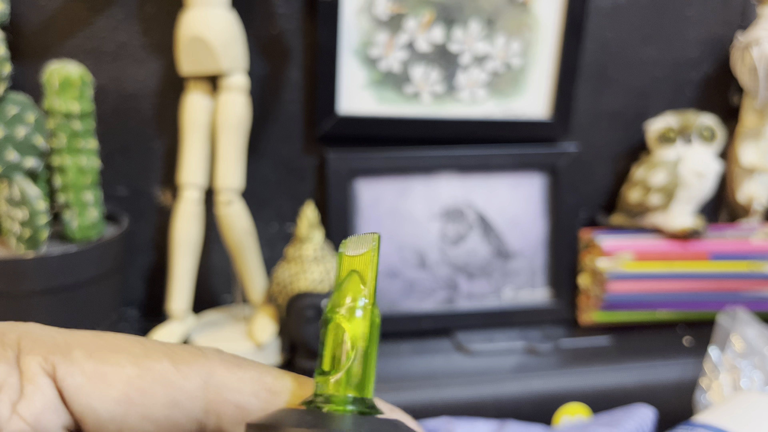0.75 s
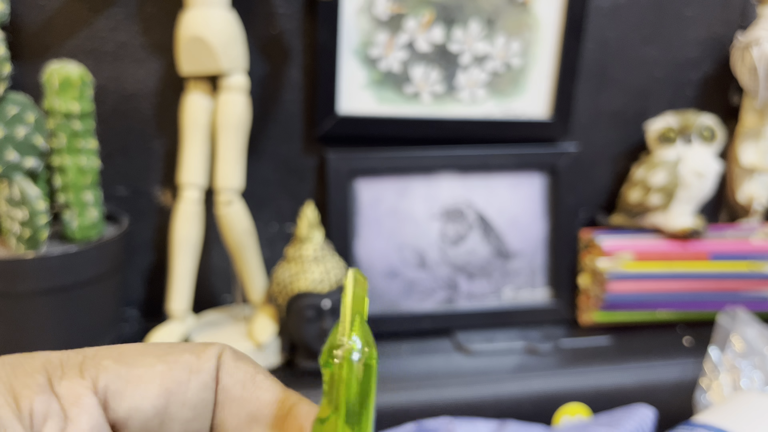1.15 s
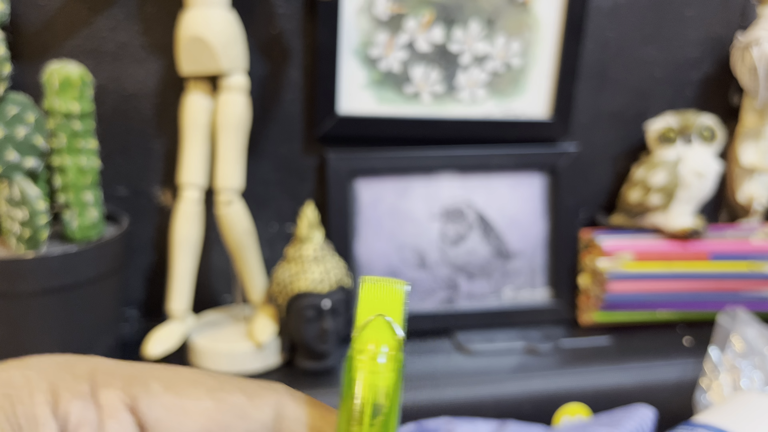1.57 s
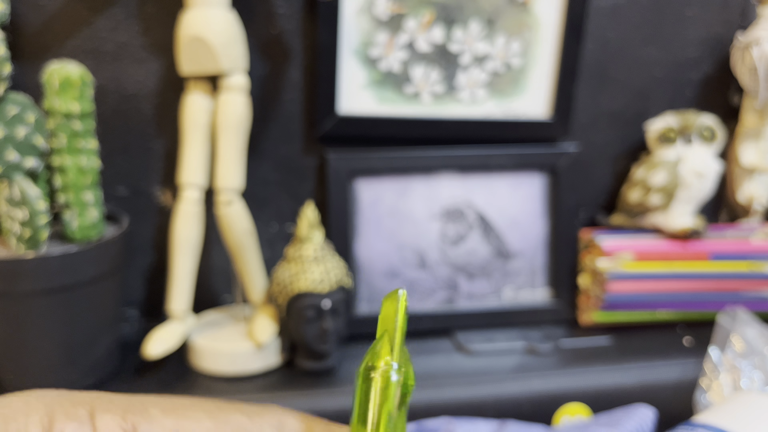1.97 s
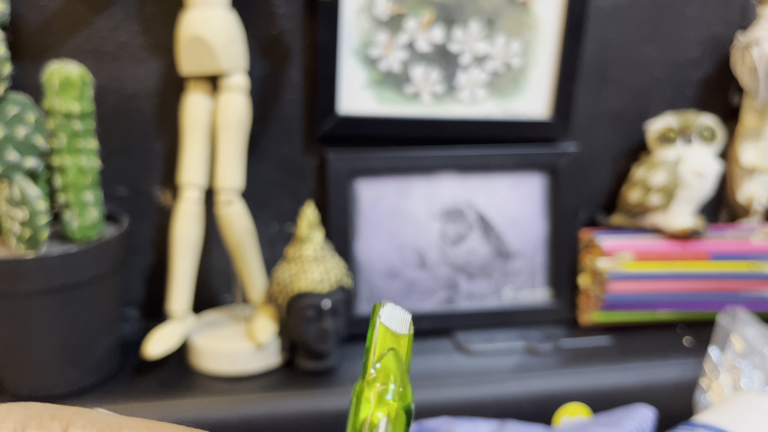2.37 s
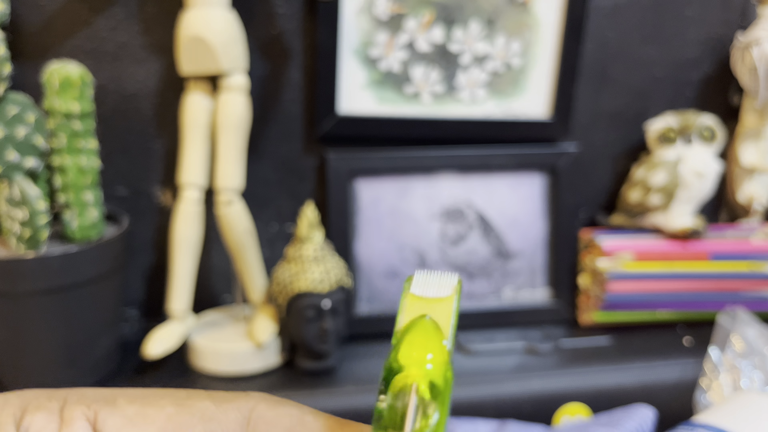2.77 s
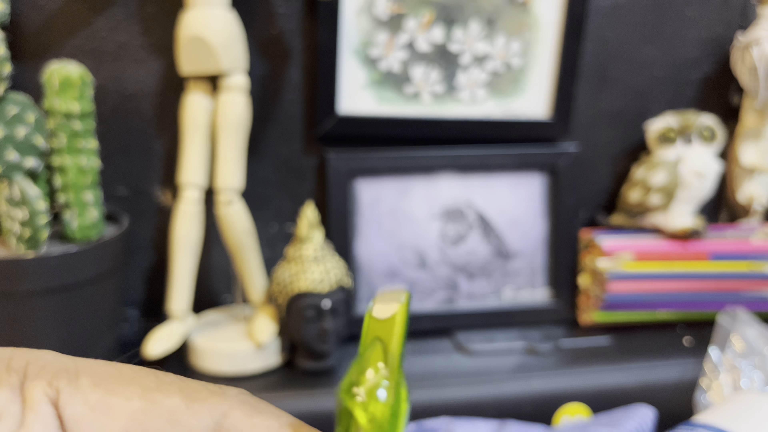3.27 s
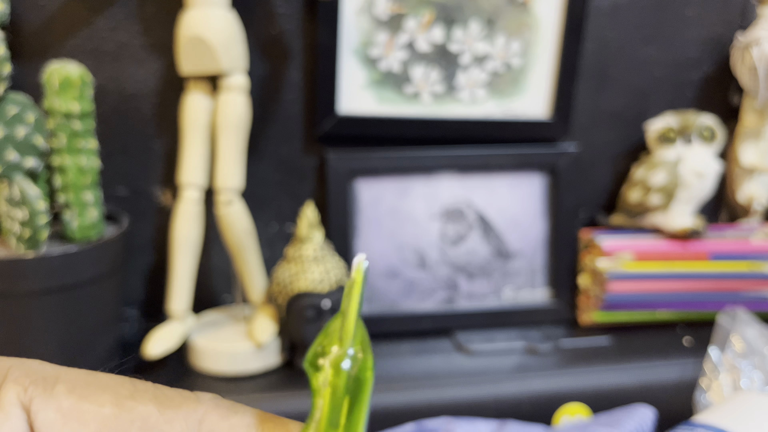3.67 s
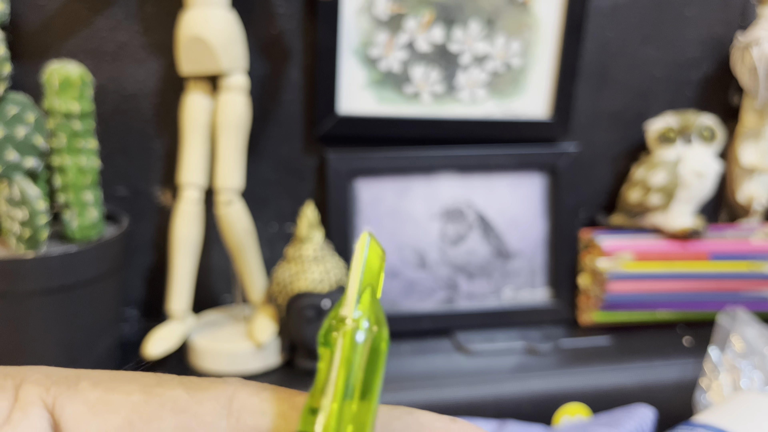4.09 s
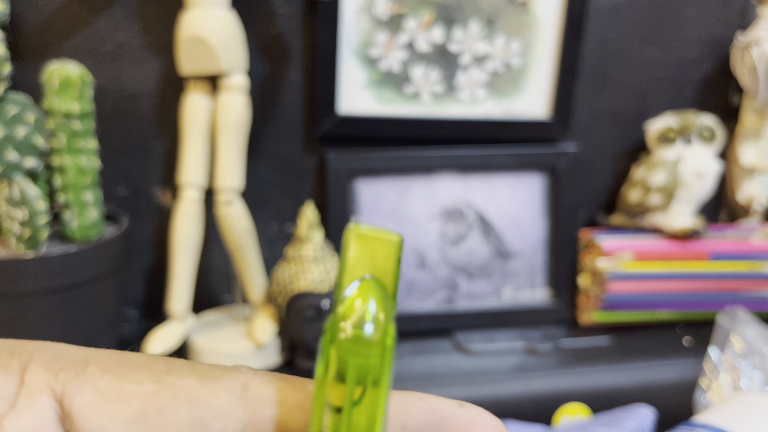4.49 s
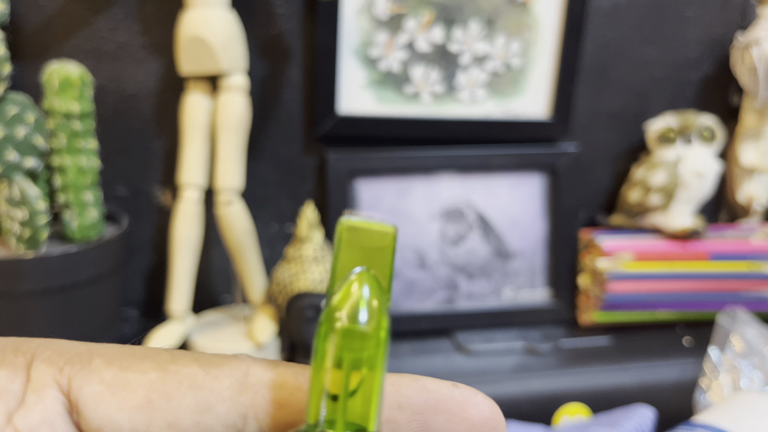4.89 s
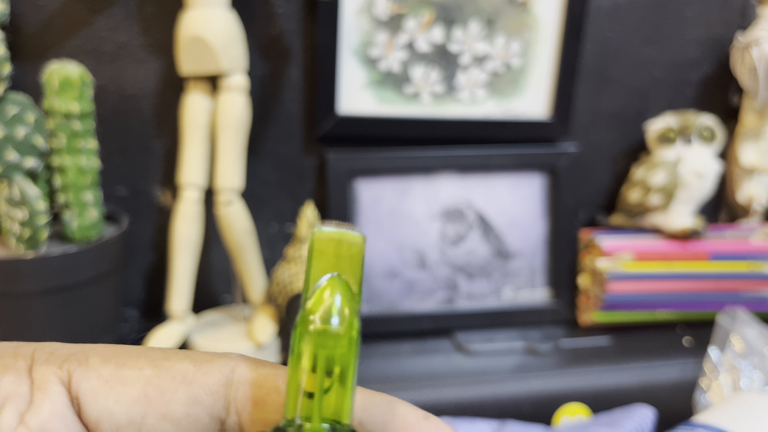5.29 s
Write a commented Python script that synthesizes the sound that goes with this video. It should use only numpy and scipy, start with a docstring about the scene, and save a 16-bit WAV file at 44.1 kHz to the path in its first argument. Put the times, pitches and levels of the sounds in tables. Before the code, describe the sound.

A small electric tattoo pen buzzes close by, softening as its adjustment ring is twisted through clusters of sharp clicks.

```python
"""A quiet room, a hand-held battery tattoo pen running close to a pair of microphone ports.
It starts loud and briefly sings, its cam knocking the needle bar twice a turn while loose parts rattle.
Over the first three seconds each twist of the depth ring clicks over a few notches, and the knock eases.
Then the clicks thin out, two faint hollow taps sound, and a whine stands out for a second before the
last two clicks. The pen turns in the hand as it runs; the room rumbles low beneath."""
import sys
import numpy as np
from scipy import signal
from scipy.fft import rfft, irfft
from scipy.io import wavfile
from scipy.ndimage import uniform_filter1d

SR = 44100
rng = np.random.default_rng(int(sys.argv[2]) if len(sys.argv) > 2 else 0)


def waveform_to_disk(signal):
    """Save audio, clipped to [-1, 1], as 16-bit WAV at the path in sys.argv[1]."""
    frames = np.transpose(np.atleast_2d(signal))
    scaled = np.clip(frames, -1, 1) * 32767
    samples = np.round(scaled).astype(np.int16)
    wavfile.write(sys.argv[1], SR, samples)


N = 244314
T = np.arange(N) / SR
BAND_LIMIT_HZ = 15800

# The motor shaft. Each row: time in seconds, speed in Hz.
SHAFT_SPEED = [(0, 120.8), (.2, 120.5), (.3, 121.0), (1.24, 120.8), (1.38, 119.85), (2.1, 120.05),
               (2.3, 120.7), (3.55, 120.7), (3.67, 120.3), (4.4, 119.97), (5.0, 119.83), (5.54, 119.7)]
# Twists of the depth ring. Each row: start and length in seconds, rebound lag in ms at grip and tube,
# the same at the tip, pitch ratios of grip, tube and tip, their three knock levels in relative dB.
TWISTS = [(0, 0, 2.4, 2.24, 1.09, 1.13, 1.016, -30, -37, -32),
          (0.216, 0.077, 1.92, 1.76, 1.125, 1.02, 0.96, -31, -40, -29.5),
          (0.387, 0.088, 1.8, 1.333, 1.064, 1.0, 1, -33, -56, -35.5),
          (0.774, 0.11, 1.425, 0.47, 0.93, 0.98, 0.96, -38, -35.5, -36),
          (1.245, 0.11, 1.12, 0.62, 1.12, 1.01, 1.075, -43.5, -49.5, -44.5),
          (1.678, 0.11, 0.96, .93, 0.93, 0.9, 1.08, -56, -69, -47),
          (2.116, 0.1, 1.1, .95, 1.13, 1.2, 1.15, -56, -55, -54.5),
          (2.625, 0.13, 0.73, 0.75, 0.9, 1.004, 1.02, -57, -50.5, -54.5),
          (3.543, 0.19, 0.78, .93, 0.84, 1.4, 1.08, -54.5, -57, -47),
          (4.005, 1, 0.83, .96, 1.46, 1.12, 1.19, -53, -52, -51),
          (5.38, 0, 1.03, .95, 0.98, 1.24, 0.95, -53.5, -49, -41.5)]
# The parts the knock rings. Each row: pitch in Hz, nominal width in Hz, relative level in dB.
GRIP_MODES = [(583, 150, -39), (907, 392, 23.5), (1315, 200, 1), (1440, 130, -1)]
TUBE_MODES = [(1778, 52, 10), (1920, 22, 8), (2160, 40, -3.5), (2900, 230, -22)]
TIP_MODES = [(3200, 1510, -3.5), (3740, 290, 13.5), (4317, 81, 7), (5193, 286, 3), (5430, 420, -6.5)]
# The buzz's tone colour. Each row: frequency in Hz near a harmonic of the knock, gain in dB.
KNOCK_COLOUR = [(240, 15), (363, 7), (484, 3.5), (604, 2.5), (725, 3), (846, -1), (1100, -4), (1210, 0),
                (1330, -6.5), (1450, -2), (1570, 0), (1700, 4.5), (1810, 2), (2000, 0.5), (2300, 5.5),
                (2700, 2.5), (3250, -9), (3385, 3.5), (3450, -17), (3630, 1.5), (3870, 2.5), (4150, -2),
                (4450, 4.5), (4750, 4.5), (5100, -5.5), (5500, 8)]
# The bearing's tone colour. Each row: frequency in Hz, gain in dB.
BEARING_COLOUR = [(600, -14), (1250, -5), (1600, 1), (2200, 1), (2550, -1), (3000, -16), (4200, -6),
                  (5000, -9), (6000, -30)]
# Bearing, whine and singing cartridge. Each row: time in seconds, level in dB.
BEARING_LEVEL = [(0, -48), (1.3, -52), (1.9, -47), (2.9, -50), (3.7, -48), (4.4, -47), (5.54, -48)]
WHINE_LEVEL = [(0, -68), (4.28, -62), (4.4, -45), (5.0, -46), (5.37, -44), (5.42, -64)]
SING_LEVEL = [(0, -34), (.08, -31), (.2, -35), (.29, -60), (5.54, -71)]
# Their tones as multiples of the shaft speed, and the gain of each whine tone in dB.
SING_ORDERS = [21, 22]
WHINE_ORDERS = [7, 13, 15, 17, 18, 19, 21, 33, 36]
WHINE_TONES_DB = [-14, -11, -8, 1, -6, -2, -11, -13, -18]

# Loose parts. Each row: time in seconds, then rattle, cartridge ring and hiss in relative dB.
LOOSE_LEVELS = [(0, -30.5, -28, -34.5), (.1, -29, -19.5, -31), (.21, -28.5, -30, -33),
                (.28, -38, -36, -46.5), (.7, -38.5, -43, -44.5), (1.15, -41, -38, -47),
                (1.55, -40, -45, -50.5), (2.05, -40.5, -42, -43.5), (2.45, -43, -42.5, -48),
                (3.0, -42, -46, -43.5), (3.6, -43, -45, -43.5), (4.15, -41, -75, -42.5),
                (4.5, -42.5, -52, -46.5), (5.3, -44, -47.5, -48), (5.54, -38, -39, -43)]
# The rattle, early and late, and the hiss. Each row: frequency in Hz, gain in dB.
RATTLE_EARLY = [(300, -17.5), (550, -12.5), (850, -3.5), (1300, -14.5), (2000, 4.5), (3000, 2.5), (4000, 3),
                (4600, 2), (5400, -1.5), (6500, -5.5), (8000, -14), (9500, -53)]
RATTLE_LATE = [(300, -26), (550, -14), (850, -4.5), (1050, -27), (1400, -9.5), (2000, -4), (2550, -1),
               (3050, -10), (3500, -2), (4300, 1.5), (5400, -2.5), (6500, -8), (8000, -10.5), (9500, -69)]
HISS_COLOUR = [(6000, -44), (7500, -6), (8900, -11.5), (9800, -3.5), (11000, 1.5), (12250, -7),
               (12650, -39), (13000, -15), (13500, -16), (14000, -8), (14800, 2), (15800, -6)]
# A broad ring of the rattle. Each row: time in seconds, level in dB, centre in Hz.
RASP = [(0, -57, 2250), (.3, -53, 2360), (1.7, -54.5, 2200), (2.2, -47.5, 2310), (2.8, -47, 2260),
        (3.3, -56, 2150), (3.9, -67, 2270), (4.15, -51, 2140), (4.4, -53, 1840), (5.54, -59, 2040)]
# The hiss peak shifts as the pen turns. Each row: time in seconds, centre in Hz, dB over the hiss.
SIZZLE = [(0.0, 10000, -8), (0.09, 9900, -9.5), (1.68, 9650, 1), (1.88, 9880, -6.5), (4.32, 9850, -3.5),
          (4.68, 9650, -2), (5.54, 9700, -2)]
# A narrow band of hiss comes and goes. Each row: time in seconds, dB over the hiss.
SHEEN = [(0, -25), (2.6, -16), (2.9, -12.5), (4.1, -19), (4.3, -22)]

# Notches of the depth ring. Each row: time in seconds, clatter in dB, snap lag in ms, then snap, tick
# and low clack in dB, lift of the upper modes in dB. The levels are relative.
NOTCHES = [(0.2644, -17, 2.1, -25, -21, -31, 3), (0.323, -26, 3.2, -10, -24, -37, -1),
           (0.44, -18, 0.34, -24, -23, -45, -4), (0.782, -13.5, 0.81, -20, -20, -39, 0),
           (.832, -15, 0.32, -15, -22, -38, 3), (0.8981, -15.5, 3, -10, -24, -47, 6),
           (1.2487, -15, 1.5, -3, -16, -41, 4), (1.2789, -16, 2.06, -6, -19, -40, -1),
           (1.316, -15, 1.35, -15, -21, -34, 4), (1.367, -18.5, 2.5, -16, -22, -31, 5),
           (1.686, -13, 4.8, -8, -19.5, -26, 0), (1.7166, -15.5, 1.95, -8.5, -20.5, -30, -1),
           (1.7671, -20.5, 3.7, -12.5, -22, -28, 2), (1.8449, -24, 0.21, -28, -24, -32, 6),
           (2.13, -36, 1.1, -12, -33, -43, 13), (2.147, -14, 6.5, -8.5, -20, -27, -3),
           (2.159, -40, 0.27, -13, -22, -37, 8), (2.1778, -16.5, 3.0, -12, -24, -24.5, 4),
           (2.1909, -30, 2, -13, -21, -42, 3), (2.213, -17, 1.3, -14.5, -22, -40, -5),
           (2.2714, -16, 3.6, -12.5, -25, -57, -1.5), (2.615, -20, 0.28, -19, -31, -41, 0),
           (2.6393, -10.5, 7.3, -9.5, -16, -29, -4), (2.667, -12.5, 0.32, -13, -18, -40, -1),
           (2.6765, -40, 0.4, -21, -30, -31, 2), (2.715, -29, 0.08, -12.5, -21.5, -30, -3),
           (2.7697, -18.5, 1.1, -14.5, -22, -27, 7), (3.3703, -34, 0.085, -30, -26.5, -34, -13),
           (3.5956, -18.5, 6.7, -25, -18.5, -29, -10), (3.7349, -19, 0.33, -29, -25, -52, -1),
           (4.0194, -24, 0.55, -20, -29.5, -39, 8), (5.4256, -20, 6.4, -18, -18, -31, 0),
           (5.5144, -18, 3.5, -17, -19.5, -45, 3)]
# The ring on the metal body, and the plastic grip. Each row: pitch in Hz, relative dB, t60 in seconds.
METAL_MODES = [(1250, 7, 0.018), (1960, 8.5, 0.03), (2370, 19, 0.027), (2830, 20, 0.0079),
               (3250, 9, 0.0056), (4520, 25.5, 0.0055), (4030, 22, 0.0096), (5560, 27, 0.0026)]
PLASTIC_MODES = [(730, 14.5, 0.028), (995, 19, 0.0097), (1173, 13, 0.032)]
# The spring's tick and the snap's crack. Each row: frequency in Hz, gain in dB.
TICK_COLOUR = [(1500, -37), (3500, 13), (4500, 2), (7000, -6), (10500, 4.5), (13000, 2), (15000, 6.5)]
CRACK_COLOUR = [(600, 2.5), (1500, -27), (2800, 9), (5000, 13), (7000, -7), (9000, -6), (11000, 0),
                (15000, -30)]

# The hand's steady rustle. Each row: time in seconds, level in dB.
RUSTLE_LEVEL = [(0, -47), (1.1, -49), (1.7, -51.5), (3.8, -52.5), (4.3, -46.5), (5.54, -47)]
# The hand shifts its hold. Each row: centre in seconds, level in dB, half-width in seconds.
HAND_SHIFTS = [(.82, -42, 0.037), (1.51, -42.5, 0.043), (1.88, -41.5, 0.047), (3.12, -41.5, 0.062),
               (3.36, -48, 0.048), (4.02, -48, 0.076), (4.68, -45, 0.085), (4.86, -46, 0.064),
               (4.98, -48.5, 0.059), (5.42, -52, 0.026)]
# Hollow taps. Each row: time in seconds, relative level in dB.
TAPS = [(3.05, -49.5), (4.642, -50)]
# Hand rustle and room tone. Each row: frequency in Hz, gain in dB.
RUSTLE_COLOUR = [(90, 2), (140, 5.5), (200, 0), (300, -7), (450, -11.5), (700, -22.5)]
RUMBLE_COLOUR = [(15, -40), (28, -55), (40, -23), (50, -12), (63, 5), (80, -1.5), (100, 10), (122, 2.5),
                 (156, -8.5), (200, -10), (260, -28.5)]

# The pen's angle to the microphone. Each row: time in seconds, turn from 0 (facing left) to 1 (turned).
PEN_TURN = [(0, 0.16), (1.3, 0.4), (1.8, 0.76), (3, 0.63), (4.4, 1), (5.54, 0.89)]
# Phase between left and right channels; the hiss near 12-13.7 kHz is in opposite polarity.
# Each row: frequency in Hz, radians with the pen facing left, radians when turned.
CHANNEL_PHASE = [(0, 0, 0), (500, .8, .7), (1150, 1.15, 2.6), (1500, 1.3, 2.0), (1750, 1.9, 2.7),
                 (2050, 2.9, 3.6), (2280, 2.75, 2.5), (2600, 2.6, 2.5), (3300, 3.2, 3.2), (4000, 4.3, 4.3),
                 (4500, 5.3, 4.6), (5200, 6.1, 5.2), (5800, 4.3, 3.6), (6600, np.pi, np.pi), (8300, .5, .7),
                 (9200, 0, 0), (11700, -2.3, -2.3), (11900, -np.pi, -np.pi), (13700, -np.pi, -np.pi),
                 (14000, -4.5, -4.5), (15700, -2 * np.pi, -2 * np.pi)]
# Stereo balance. Each row: frequency in Hz, left over right in dB.
LEAN_FACING = [(60, 0.5), (200, -1.5), (480, 4.5), (725, 9.5), (1000, 3.5), (1450, 4.5), (2380, 2),
               (3400, 3), (5000, 9), (8120, -1), (15000, 1)]
LEAN_TURNED = [(60, -0.5), (110, -2), (200, -1.5), (380, -0.5), (700, 6.5), (1290, 2.5), (1900, 9.5),
               (2500, 2), (4400, 7), (8120, -0.5), (15000, -1)]
# The hand shades the clicks from the right port. Each row: frequency in Hz, loss in dB.
HAND_SHADE = [(600, 2.5), (1500, -3.5), (2400, 6), (3100, 10), (4000, 0), (5000, 12), (7000, 3.5),
              (10000, 0.5)]
# Noise in the two channels. Each row: frequency in Hz, share common to both.
COHERENCE = [(60, .97), (250, 0.7), (600, 0.2), (1700, 0.3), (2550, .85), (3300, .5), (4500, 0.1),
             (6500, 0.7), (9000, 0.85), (12500, .95), (15000, 0.88)]


def pen():
    """The running pen, close up: one shaft times the pitched buzz and the noise of the loose parts."""
    shaft_hz, = columns(SHAFT_SPEED)
    lag_ms, tip_lag_ms, *voicing = depth_settings()
    turns = np.cumsum(shaft_hz) / SR + .89 + 0.00018 * wander(300)
    # grip, tube, tip: the blow arrives a share of a turn later at each, and a weaker rebound follows
    drive = np.array([blows(turns - late) + .65 * blows(turns - late - rebound_ms / 1000 * shaft_hz)
                      for late, rebound_ms in ((0, lag_ms), (0.0946, lag_ms), (0.1573, tip_lag_ms))])
    drive *= amp(0.27 * wander(500))  # no two blows land quite alike
    buzz = knock(drive, pitches=voicing[:3], levels_db=voicing[3:]) + whine(turns) + bearing(drive, turns)
    return buzz, loose_parts(turns)


def depth_settings():
    """Rebound lags, pitches and knock levels hold between twists and slide during each one."""
    rows = [TWISTS[0][:1] + TWISTS[0][2:]]
    for (_, _, *old), (start, length, *new) in zip(TWISTS, TWISTS[1:]):
        rows += [(start, *old), (start + length, *new)]
    return columns(rows)


def blows(turns):
    """The cam's blow: one sharp pulse each whole turn, with harmonics up to half the band limit."""
    harmonics = int(BAND_LIMIT_HZ / 2 / SHAFT_SPEED[0][1])
    half = np.sin(np.pi * turns)
    return np.sin((2 * harmonics + 1) * np.pi * turns) / np.where(abs(half) < 1e-9, 1e-9, half) - 1


def knock(drive, pitches, levels_db):
    """The blows ring grip, tube and tip; some harmonics of the buzz stand out, others sink."""
    parts = np.zeros(N)
    for blow, pitch, level, modes in zip(drive, pitches, levels_db, (GRIP_MODES, TUBE_MODES, TIP_MODES)):
        ringing = sum((-1) ** k * amp(db) * band(blow, hz * pitch, 1.7 * width)
                      for k, (hz, width, db) in enumerate(modes))
        parts += amp(level) * unit_rms(ringing)
    low_cut = signal.butter(2, 520, "high", fs=SR, output="sos")  # a slim pen sends out little bass
    return signal.sosfilt(low_cut, coloured(parts, KNOCK_COLOUR))


def whine(turns):
    """Clean tones on multiples of the shaft speed; the cartridge sings two at the deepest setting."""
    phase = 2 * np.pi * turns
    tones = sum(amp(db) * np.sin(k * phase) for k, db in zip(WHINE_ORDERS, WHINE_TONES_DB))
    tones *= fader(WHINE_LEVEL) * amp(wander(900))
    singing = sum(np.sin(k * phase) for k in SING_ORDERS)
    return tones + fader(SING_LEVEL) * amp(wander(400)) * singing


def bearing(drive, turns, cage_share=.403):
    """The ball cage turns at a share of the shaft speed, so the balls beat against the knock."""
    cage = 2 * np.pi * cage_share * turns
    beating = drive[1] * np.cos(cage) + drive[2] * np.cos(2 * cage)
    return fader(BEARING_LEVEL) * unit_rms(coloured(beating, BEARING_COLOUR))


def loose_parts(turns):
    """Rattle, cartridge ring and hiss: flickering grit that puffs slightly with each turn."""
    rattle_db, ring_db, hiss_db = columns(LOOSE_LEVELS)
    puffs = 9.0 + np.exp(-(turns % 1) / 0.053)
    grit = rng.standard_normal((2, 2, N)) * puffs
    grit *= amp(1.5 * wander(9) + 1.4 * wander(78) + 1.11 * wander(1240))
    return rattle(grit[0], rattle_db) + cartridge(grit[0], ring_db) + amp(hiss_db) * hiss(grit[1])


def rattle(grit, level_db, shake_db=-45, shake_fade_s=0.02):
    """Loose parts rattle and rasp; every notch shakes them a little harder."""
    shakes = sum((T > s) * np.exp(-abs(T - s) / shake_fade_s) for s, *_ in NOTCHES)
    gain = np.hypot(amp(level_db), amp(shake_db) * np.sqrt(shakes))
    early, late = unit_rms(coloured(grit, RATTLE_EARLY)), unit_rms(coloured(grit, RATTLE_LATE))
    blend = np.interp(T, (3.8, 4.76), (0, 1))
    rasp_db, rasp_hz = columns(RASP)
    rasp = amp(rasp_db) * unit_rms(band(grit, rasp_hz, width_hz=760))
    return gain * ((1 - blend) * early + blend * late) + rasp


def cartridge(grit, level_db, width_hz=170):
    """The loose cartridge rings, never quite on one pitch."""
    hz = 2575 + 40 * wander(5300)
    ringing = resonate(resonate(grit, hz, width_hz), hz, 2 * width_hz)
    return amp(level_db - 8 + 3.0 * wander(600)) * unit_rms(ringing)


def hiss(grit):
    """The pen's top end: broad hiss, a shifting peak and a narrow sheen."""
    sizzle_hz, sizzle_db = columns(SIZZLE)
    sizzle = amp(sizzle_db) * unit_rms(band(grit[::-1], sizzle_hz, width_hz=790))
    sheen = fader(SHEEN) * unit_rms(band(grit, hz=8600, width_hz=280))
    return unit_rms(coloured(grit, HISS_COLOUR)) + sizzle + sheen


def depth_ring(clatter_s=.0075, crack_fade_s=.00059, upper_hz=3300):
    """A bright tick as the spring lets go, a snap and crack as the ring drops home, clatter around it."""
    ticks, cracks, clacks = np.zeros((3, N))
    metal = np.zeros(N + 3000)
    t = np.arange(-100, 200) / SR
    tick_shape = np.exp(-(t / np.where(t < 0, .0002, .001)) ** 2)
    crack_shape = amp(-14.5) * np.exp(-np.arange(300) / SR / crack_fade_s)
    bounces = rng.random((len(NOTCHES), 2, 10))
    noises = rng.standard_normal((len(NOTCHES), 2, 300))
    holds = rng.uniform(-1, 1, (len(NOTCHES), len(METAL_MODES), 2))
    for notch, (when, size), (tick_noise, crack_noise), hold in zip(NOTCHES, bounces, noises, holds):
        s, clatter_db, lag_ms, snap_db, tick_db, clack_db, upper_db = notch
        at, lag = round(s * SR), round(lag_ms / 1000 * SR)
        ticks[at - 100:at + 200] += amp(tick_db) * tick_shape * tick_noise
        cracks[at + lag:at + lag + 300] += amp(snap_db) * crack_shape * crack_noise
        snaps = np.zeros(3000)
        snaps[lag] = amp(snap_db)
        clatter = (np.append(0, when[1:]) ** 1.5 * clatter_s * SR).astype(int)
        np.add.at(snaps, clatter, amp(clatter_db - 6 * when) * np.sign(size - .5) * (.5 + abs(size - .5)))
        # the fingers damp each notch differently, spreading the modes' pitch and level
        modes = [(hz * (1 + .06 * tune), db + 4 * damp + upper_db * (hz > upper_hz), t60)
                 for (hz, db, t60), (tune, damp) in zip(METAL_MODES, hold)]
        metal[at:at + 3000] += struck(snaps, modes)
        np.add.at(clacks, at + clatter + 30, amp(clack_db - 4) * np.cos(np.pi * size))
        clacks[at + lag] += amp(clack_db - 0.5)
    tick_gain = np.sqrt(np.mean(amp(spectrum_at(TICK_COLOUR, np.linspace(0, SR / 2, 200))) ** 2))
    mids = signal.butter(4, [640, 6800], "band", fs=SR, output="sos")  # small parts, blunt blows
    body = signal.sosfilt(mids, metal[:N] + struck(clacks, PLASTIC_MODES))
    return coloured(ticks, TICK_COLOUR) / tick_gain + coloured(cracks, CRACK_COLOUR) + body


def hand(noise):
    """The hand rustles on the pen and swells briefly as it shifts its hold."""
    shift_power = sum(amp(2 * db) * np.exp(-((T - s) / width) ** 2) for s, db, width in HAND_SHIFTS)
    gain = np.hypot(fader(RUSTLE_LEVEL), np.sqrt(shift_power))
    return gain * unit_rms(coloured(noise, RUSTLE_COLOUR))


def hollow_taps(noise):
    """Two faint taps: short swells of one narrow resonance."""
    swells = sum(amp(db) * np.exp(-((T - s - .015) / 0.029) ** 2) for s, db in TAPS)
    return 0.83 * swells * unit_rms(resonate(noise, hz=724, width_hz=37))


def walls(x, t60=.03):
    """Nearby shelf and walls: echoes that die fast, other ones for each port."""
    t = np.arange(2000) / SR
    echoes = rng.choice([-1., 1.], (2, 2000)) * (rng.random((2, 2000)) < .15)
    echoes *= amp(-60 * t / t60) * (t > .002)
    echoes /= np.linalg.norm(echoes, axis=1, keepdims=True)
    return signal.fftconvolve(x[None], echoes, axes=1)[:, :N]


def room_tone(noise):
    """The room's low rumble, wavering slightly in level."""
    return amp(-47.5 - wander(3700)) * unit_rms(coloured(noise, RUMBLE_COLOUR))


def stereo_image(direct, clicks, diffuse):
    """Phase and balance between the channels shift as the pen turns; their noise is partly their own."""
    frames = dict(fs=SR, nperseg=1024, noverlap=768)
    hz, t, (direct_z, click_z, common, own) = signal.stft([direct, clicks, *diffuse], **frames)
    turn = np.interp(t, *np.transpose(PEN_TURN))
    f, facing, turned = np.transpose(CHANNEL_PHASE)
    phase = np.outer(np.interp(hz, f, facing), 1 - turn) + np.outer(np.interp(hz, f, turned), turn)
    lean_db = np.outer(spectrum_at(LEAN_FACING, hz), 1 - turn)
    lean_db += np.outer(spectrum_at(LEAN_TURNED, hz), turn)
    alike = spectrum_at(COHERENCE, hz)[:, None]
    right_noise = alike * common + np.sqrt(1 - alike ** 2) * own
    shaded_clicks = click_z / amp(spectrum_at(HAND_SHADE, hz))[:, None]
    left = direct_z + click_z + common
    right = (direct_z + shaded_clicks + right_noise) * np.exp(-1j * phase) / amp(lean_db)
    return signal.istft([left, right], **frames)[1][:, :N]


def amp(db):
    """Decibels to gain."""
    return 10 ** (np.asarray(db) / 20)


def unit_rms(x):
    """Scales to rms 1."""
    return x / np.sqrt(np.mean(x ** 2) + 1e-20)


def columns(rows):
    """Joins timed rows into one curve for each column."""
    s, *values = np.transpose(rows)
    return [np.interp(T, s, v) for v in values]


def fader(rows):
    """Gain over time from rows of seconds and dB."""
    return amp(columns(rows)[0])


def spectrum_at(points, hz):
    """Reads a spectrum on a log-frequency axis."""
    f, value = np.transpose(points)
    return np.interp(np.log(hz + 1), np.log(f + 1), value)


def coloured(x, points):
    """Filters x by a spectrum in dB."""
    hz = np.fft.rfftfreq(N, 1 / SR)
    return irfft(rfft(x) * amp(spectrum_at(points, hz)), N)


def resonate(x, hz, width_hz):
    """A resonance of gain 1 at its centre, which may move: shift down, smooth, shift back."""
    carrier = np.exp(2j * np.pi * np.cumsum(hz * np.ones(N)) / SR)
    pole = np.exp(-np.pi * width_hz / SR)
    return 2 * (carrier * signal.lfilter([1 - pole], [1, -pole], x / carrier)).real


def band(x, hz, width_hz):
    """The same resonance twice over, for steeper sides."""
    return resonate(resonate(x, hz, width_hz), hz, width_hz)


def struck(train, modes):
    """Rings a set of modes with a train of blows; a single blow peaks at its size."""
    t = np.arange(2000) / SR
    ring = sum(amp(db - 60 * t / t60) * np.sin(2 * np.pi * hz * t) for hz, db, t60 in modes)
    return signal.oaconvolve(train, ring / abs(ring).max())[:len(train)]


def wander(samples):
    """Random drift of rms 1, smoothed over some samples."""
    return unit_rms(uniform_filter1d(uniform_filter1d(rng.standard_normal(N), samples), samples))


def scene():
    """Pen and depth ring close to the microphone; hand, echoes and room tone behind them."""
    buzz, loose = pen()
    clicks = depth_ring()
    room_noise, hand_noise = rng.standard_normal((2, 2, N))
    background = hand(hand_noise) + room_tone(room_noise)
    echoes = walls(amp(-15) * clicks + amp(-20) * buzz)
    return stereo_image(buzz + hollow_taps(hand_noise[0]), clicks, loose + background + echoes)


def record(dry):
    """The deepest bass is dropped; then the band limit."""
    thin = signal.sosfilt(signal.butter(2, 38, "high", fs=SR, output="sos"), dry)
    high_cut = signal.firwin(511, BAND_LIMIT_HZ, window=("kaiser", 9), fs=SR)
    return signal.oaconvolve(thin, high_cut[None], "same")


dry = scene()
out = record(dry)
waveform_to_disk(out)
```